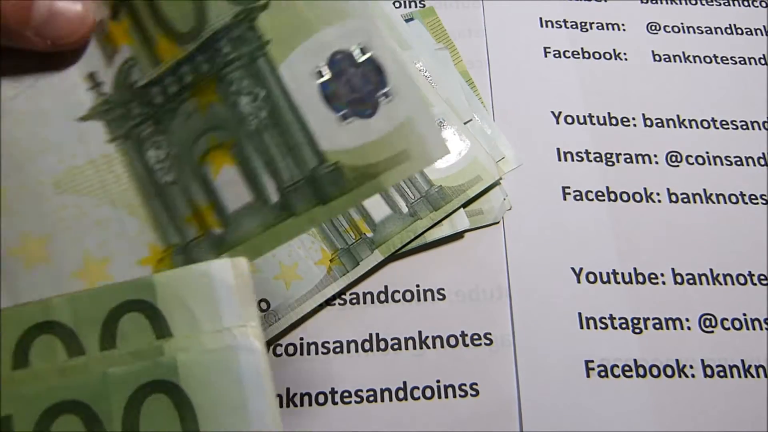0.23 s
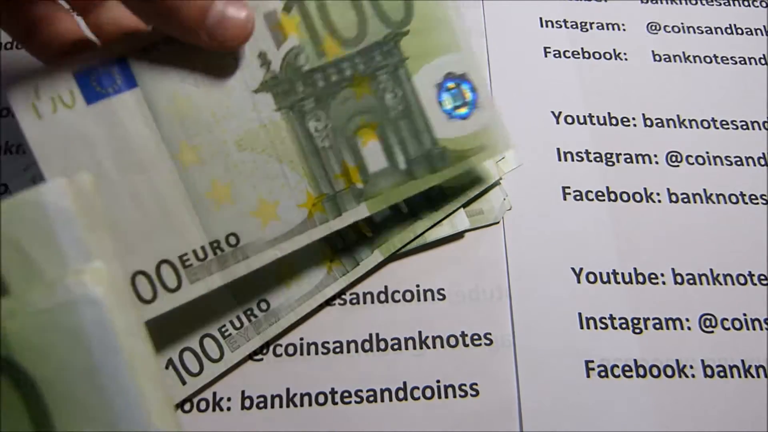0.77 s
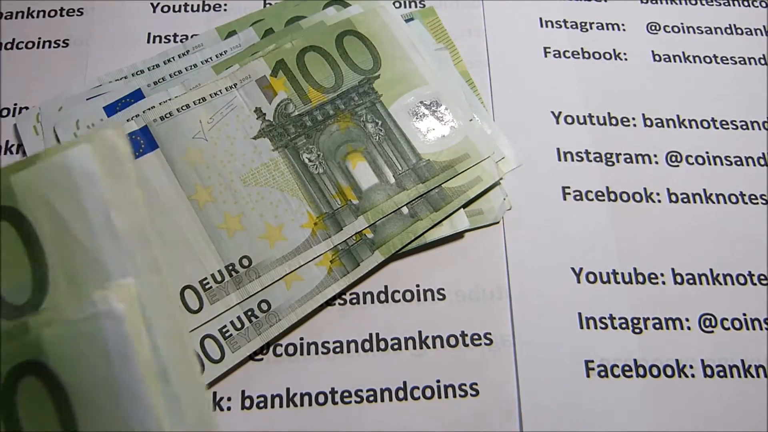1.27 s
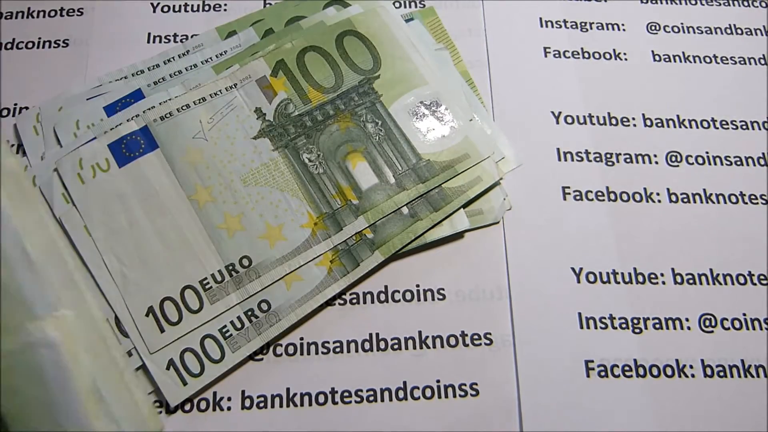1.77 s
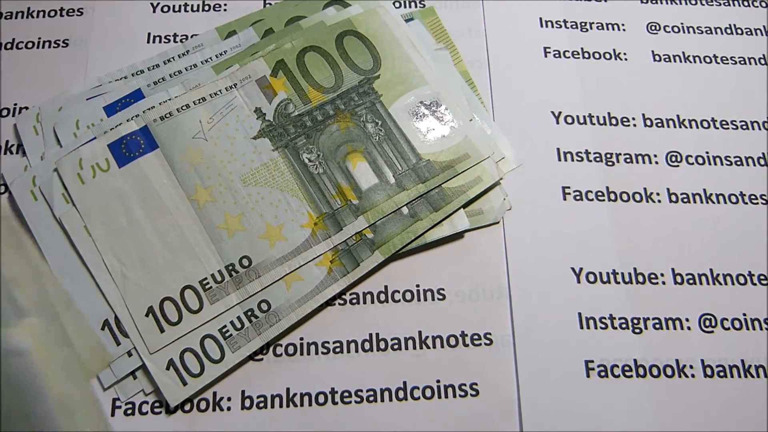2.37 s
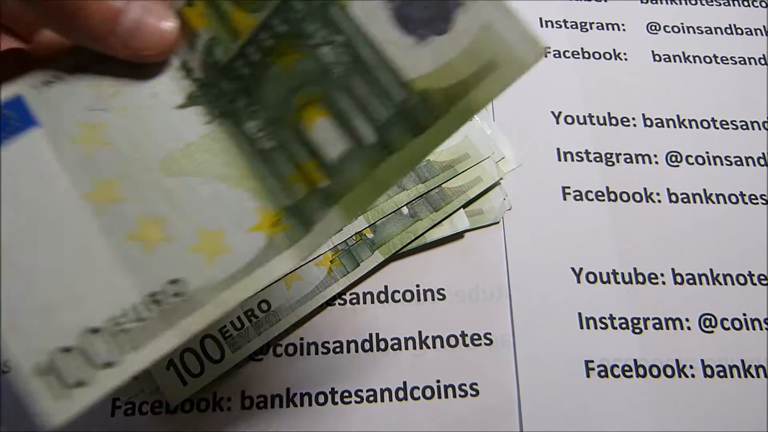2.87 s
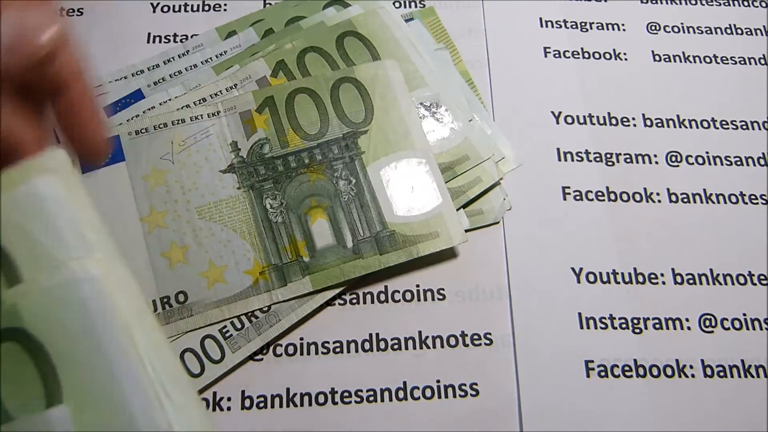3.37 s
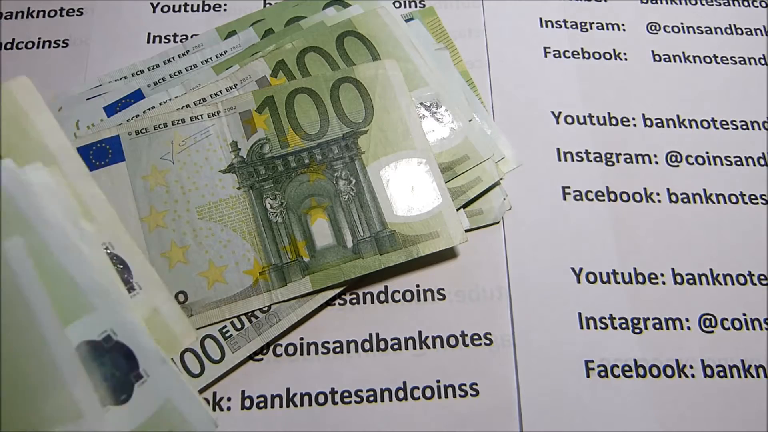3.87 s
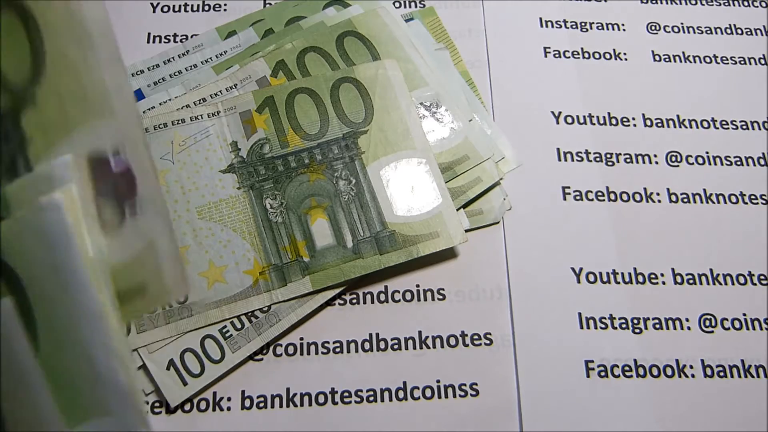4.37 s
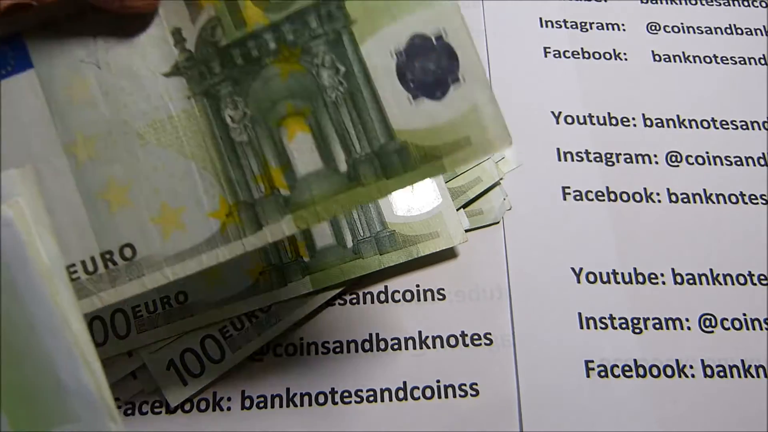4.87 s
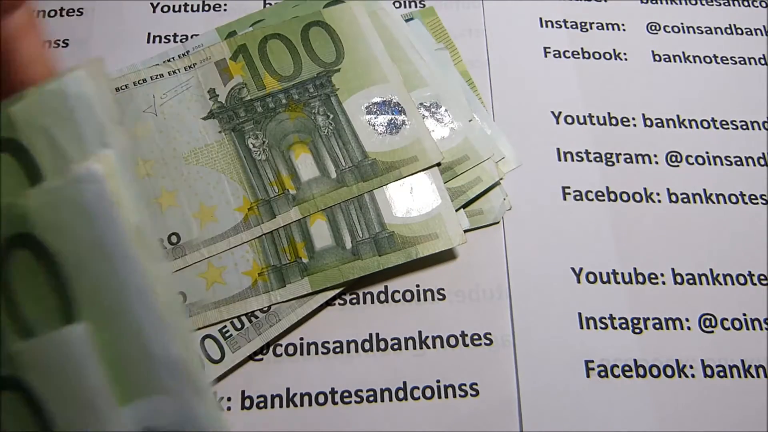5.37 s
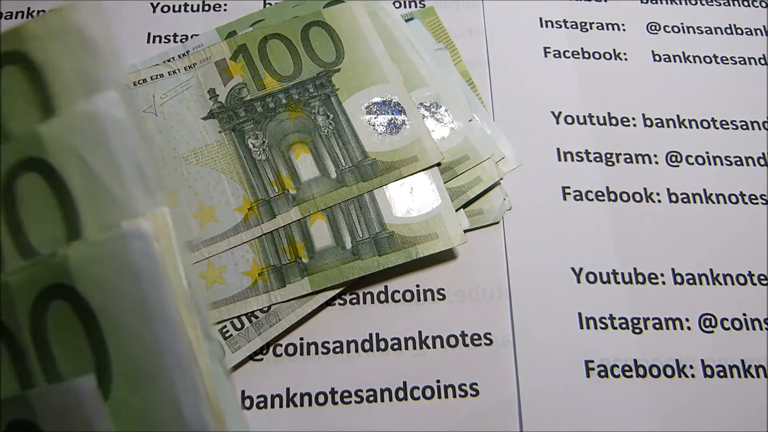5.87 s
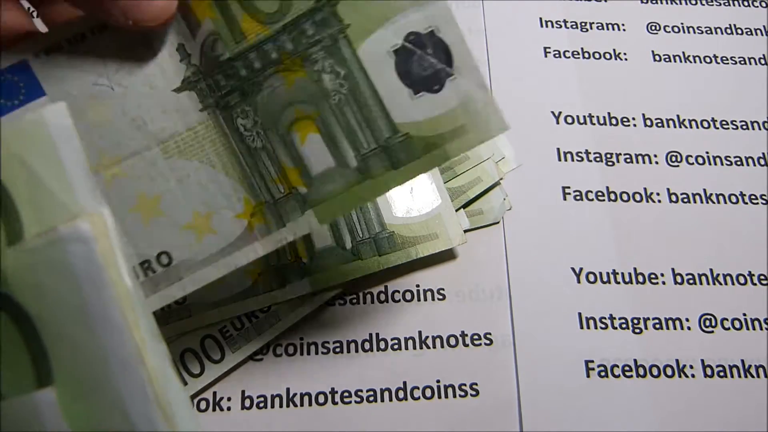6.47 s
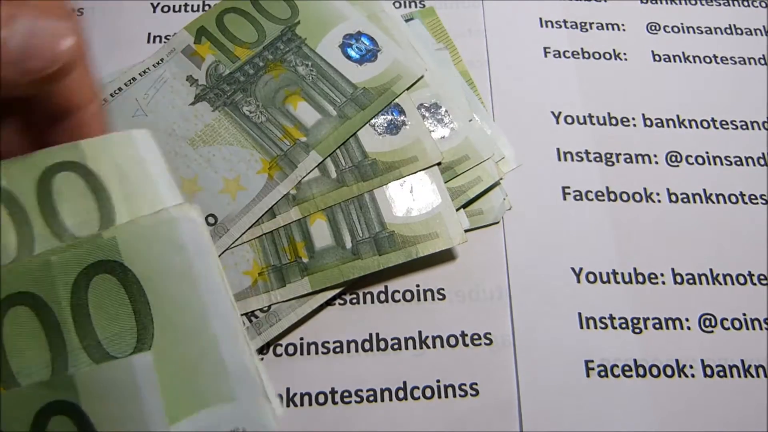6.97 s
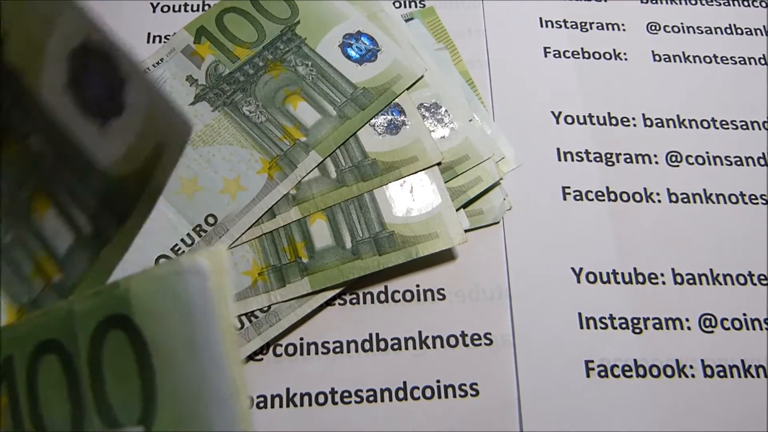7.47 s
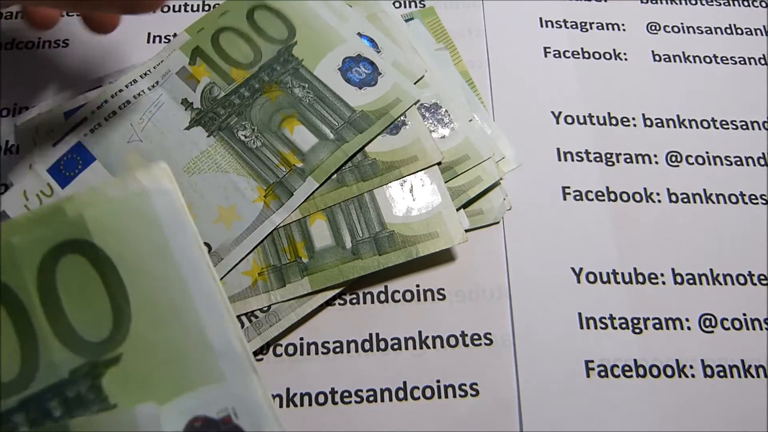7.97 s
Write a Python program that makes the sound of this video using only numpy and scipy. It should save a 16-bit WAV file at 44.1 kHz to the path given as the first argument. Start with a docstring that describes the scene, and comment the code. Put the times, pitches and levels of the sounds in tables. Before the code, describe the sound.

Banknotes slide one by one off a wad onto a pile, hissing and crackling crisply, until one taut note snaps loudly near the end.

```python
"""Grainy hisses of a thumb sliding paper over paper run throughout: banknotes peeled off a wad onto a pile on a table.
Strokes are coloured friction noise; pats, buckles and flicks are dying bursts of noise in their own bands.
A note drags with a sinking hollow rush, a few faint tones ring, and near the end a taut note snaps loudly.
Table echoes, a small quiet room, a faint handling hum and background hiss surround it, in stereo close to a camera."""
import sys
import numpy as np
from scipy import signal
from scipy.fft import rfft, irfft
from scipy.io import wavfile

SR = 44100
rng = np.random.default_rng(int(sys.argv[2]) if len(sys.argv) > 2 else 0)


def pcm_store(signal):
    """Save signal as 16-bit PCM."""
    levels = np.round(np.clip(np.atleast_2d(signal), -1, 1) * 32767)
    wavfile.write(sys.argv[1], SR, levels.astype(np.int16).T)


N = 362061
TIME = np.arange(N) / SR  # [s]
EDGE_HZ = 15700
STROKE_RISE_S, STROKE_RELEASE_S = 0.0331, 0.037  # quarter-sine rise; 1/e release
REST_HISS_DB, REST_BODY_DB = -72.5, -75  # the held wad never lies quite still

# still room and microphone hiss, common to both sides: (frequency [Hz], relative density [dB])
AIR_MID_COLOUR = [(20, 3), (60, -1.5), (130, 1.5), (215, -1), (340, 1.5), (600, -1), (1200, -6.5),
                  (2500, -7), (4000, -11), (7000, -9.5), (10000, -12.5), (15500, -21.5)]
# the same, opposite in the two sides: (frequency [Hz], relative density [dB])
AIR_SIDE_COLOUR = [(20, -21.5), (90, -17.5), (160, -11.5), (250, -9.5), (400, -14), (600, -11),
                   (1000, -14.5), (2000, -20.5), (4000, -25), (8000, -29.5), (15500, -44.5)]
# low resonance of the still room: (frequency [Hz], width [Hz], level above the plain colour [dB])
ROOM_MODE_PEAK = [(211.5, 17.5, 10.5)]
# hollow hum as the camera is jostled: (middle time [s], length [s], relative level [dB])
JOSTLE_SWELLS = [(1.4, 11.1, -64), (2.898, 0.53, -68.5), (3.98, 0.234, -61.5), (7.297, 0.94, -65.5)]
# paper over paper:
# (start [s], length [s], relative hiss level [dB], swell start to end [dB], relative body level [dB])
PAPER_STROKES = [(-0.022, 0.0754, -53.5, -7, -63.5), (0.079, 0.0728, -47.5, 8, -56),
                 (0.164, 0.0602, -44.5, 2, -52.5), (0.263, 0.0808, -48, 7, -59),
                 (0.466, 0.0842, -52, 5.5, -59.5), (0.591, 0.112, -52, -3, -59.5),
                 (0.718, 0.0317, -45.5, 0, -57.5), (0.805, 0.013, -50.5, 0, -62.5),
                 (0.995, 0.035, -62.5, -4.5, -74.5), (1.116, 0.0613, -58, 7.5, -66.5),
                 (1.229, 0.04, -58.5, 5.5, -64.5), (1.465, 0.0178, -58, 8.5, -62.5),
                 (1.571, 0.073, -58, 7, -64.5), (1.673, 0.0905, -60, 6.5, -70.5),
                 (1.799, 0.1634, -54.5, -15.5, -67.5), (1.967, 0.1815, -57.5, 14.5, -66),
                 (2.214, 0.244, -56, 4.5, -65.5), (2.472, 0.1107, -46.5, 5.5, -59.5),
                 (2.646, 0.299, -52.5, -3.5, -62.5), (3.393, 0.258, -67.5, 15.5, -78),
                 (3.673, 0.11, -59.5, 15, -67.5), (3.808, 0.1004, -52.5, 4.5, -63),
                 (3.91, 0.192, -56, 1.5, -65), (4.198, 0.123, -52.0, -6, -62),
                 (4.319, 0.131, -50, 11.5, -57), (4.464, 0.0543, -49.5, 4.5, -61),
                 (4.635, 0.111, -62, -6.5, -74), (4.744, 0.0476, -58, -1, -72),
                 (5.134, 0.085, -63.5, -10.5, -79), (5.249, 0.0324, -53, -1, -65),
                 (5.36, 0.39, -65.5, 2.5, -66.5), (5.54, 0.238, -54.5, 9, -66),
                 (5.794, 0.1403, -51.5, -0.5, -61.5), (5.948, 0.0898, -51.5, 0.5, -59.5),
                 (6.082, 0.0808, -52, 15, -67.5), (6.234, 0.158, -52.5, 0.5, -65.5),
                 (6.447, 0.1402, -60.5, 13, -65.5), (6.656, 0.0924, -65, 9.5, -63),
                 (7.063, 0.18, -51.5, 1, -60.0), (7.276, 0.2214, -55.5, 20.5, -60),
                 (7.538, 0.0824, -44, -5.5, -49), (7.885, 0.098, -58.5, -5.5, -62.5),
                 (8.024, 0.0474, -55.5, 2.5, -64.5), (8.13, 0.0465, -68, 7.5, -67)]
# friction hiss: (frequency [Hz], relative density [dB])
HISS_COLOUR = [(600, -19.5), (1500, -11), (2100, -9.5), (2600, -7), (3200, -6.5), (4200, -4), (5000, 1),
               (6200, 0.5), (7300, 1.5), (8400, -2), (10000, -8.5), (12000, -16), (14000, -25),
               (16000, -67.5)]
# hollow body of the sheet: (frequency [Hz], relative density [dB])
BODY_COLOUR = [(80, -38), (200, -8.5), (430, -10), (600, -2), (900, 2.5), (1050, -1), (1450, 1.5),
               (1750, -3), (2100, -9), (2800, -4.5), (6000, -30)]
# sheets resonating over the table: (frequency [Hz], width [Hz], level above the plain colour [dB])
SHEET_MODES = [(592, 30, -4), (926, 45, 0), (1160, 50, -2), (1312, 30, -1), (1390, 30, -1), (1735, 50, -2)]
# flat sheet pats the pile, a finger or the wad:
# (time [s], decay time [s], relative level [dB], lowest frequency [Hz], highest frequency [Hz])
SHEET_PATS = [(0.031, 0.0068, -56.5, 590, 1380), (0.3017, 0.00223, -47, 560, 1115),
              (0.305, 0.006, -60.5, 150, 330), (0.414, 0.0047, -58, 200, 800),
              (0.972, 0.0184, -62.5, 110, 377), (2.594, 0.0031, -57.5, 500, 1400),
              (2.596, 0.0087, -56, 150, 330), (2.865, 0.0049, -55.5, 130, 804),
              (3.007, 0.0075, -56.5, 450, 1090), (3.659, 0.00132, -60.5, 200, 2000),
              (4.49, 0.00073, -42.5, 220, 1676), (4.588, 0.0028, -51.5, 190, 1490),
              (6.74, 0.0083, -51.5, 300, 1190), (6.884, 0.01, -51, 590, 1484),
              (7.401, 0.0045, -49.5, 554, 1650), (7.489, 0.0034, -49.5, 314, 680),
              (7.531, 0.00207, -30, 840, 1535), (7.536, 0.0051, -35, 898, 1380),
              (7.636, 0.0066, -48, 820, 950), (7.6458, 0.0026, -40, 654, 1980),
              (7.684, 0.0062, -34, 800, 1370), (7.6863, 0.004, -43.5, 325, 2110),
              (7.8, 0.0037, -51, 693, 940), (7.962, 0.00295, -58.5, 654, 890),
              (8.0164, 0.00225, -42.5, 727, 2170)]
# pat colour from its lowest frequency down: (multiple of lowest frequency [1], relative density [dB])
PAT_LOW_SKIRT = [(.15, -35), (.65, -6), (1, 2.5)]
# pat colour from its highest frequency up: (multiple of highest frequency [1], relative density [dB])
PAT_HIGH_SKIRT = [(1, 3), (1.45, -10), (3, -14), (9, -73.5)]
# sheet buckles: (time [s], decay time [s], relative crack level [dB], main facet [Hz], second facet [Hz],
# top of the crack's band [Hz], relative flap level [dB], relative air push level [dB])
SHEET_BUCKLES = [(0.2228, 0.0033, -57.5, 4900, 6000, 8000, -58.5, -68),
                 (0.953, 0.0023, -64, 3200, 2300, 6500, -65, -60.5),
                 (0.971, 0.0019, -61, 2370, 2250, 3000, -60.5, -61.5),
                 (0.993, 0.00105, -55, 6200, 4700, 7100, -77, -66),
                 (1.011, 0.002, -67, 3100, 2200, 4000, -76, -71.5),
                 (1.0196, 0.00202, -47.5, 7200, 6430, 8800, -52.5, -60),
                 (1.839, 0.00255, -46, 4720, 2510, 5500, -51.5, -64),
                 (1.862, 0.0012, -48, 4720, 2980, 5500, -58.5, -70.5),
                 (2.615, 0.0031, -64.5, 6000, 4500, 8000, -55, -57),
                 (2.695, 0.00323, -40, 2355, 6200, 7350, -52, -69.5),
                 (2.717, 0.0052, -39.5, 6260, 5300, 8700, -51, -58.5),
                 (2.739, 0.0025, -46, 4630, 5500, 8000, -59, -65.5),
                 (2.755, 0.0036, -48.5, 4600, 3400, 7500, -66, -66.5),
                 (2.769, 0.0042, -40, 5360, 4300, 8200, -54, -63.5),
                 (2.775, 0.00334, -40.5, 5340, 2520, 8200, -52, -70),
                 (2.832, 0.0029, -40.5, 6300, 2440, 8200, -53.5, -75.5),
                 (2.8412, 0.0015, -38, 4770, 5700, 7000, -54, -55.5),
                 (2.851, 0.0017, -44.5, 5300, 4060, 7000, -55, -57),
                 (2.883, 0.0032, -40, 5640, 2480, 7650, -52, -59),
                 (2.9505, 0.0026, -51, 3990, 6000, 8000, -60.5, -78),
                 (2.9944, 0.0019, -46.5, 4070, 4250, 5800, -60, -64),
                 (3.0282, 0.00154, -39.5, 5095, 3510, 8080, -54, -61.5),
                 (3.161, 0.0038, -64, 2300, 3200, 7000, -58, -68),
                 (4.187, 0.0017, -57.5, 2300, 3480, 7000, -55.5, -62),
                 (5.2408, 0.0033, -46, 6140, 2680, 11100, -54, -61.5),
                 (5.271, 0.00095, -54, 4220, 2900, 5400, -55.5, -60),
                 (5.603, 0.00227, -55.5, 6600, 4500, 8000, -56, -68.5),
                 (7.5314, 0.0012, -32.5, 6850, 5100, 11900, -31, -70),
                 (7.536, 0.00275, -37, 3750, 5400, 8500, -44.5, -69),
                 (7.6871, 0.003, -39, 4820, 3400, 7500, -35.5, -48.5),
                 (8.0154, 0.00205, -47.5, 4780, 3600, 6500, -56, -73.5)]
# creases giving way: (frequency [Hz], relative density [dB])
CRACK_COLOUR = [(400, -39.5), (1200, -4), (2000, -2.5), (2450, 4), (3200, 1), (3900, 3), (5200, 1.5),
                (6600, 3.5), (8300, 3.5), (9500, -3.5), (12000, -6.5), (16000, -46.5)]
# whole sheet flipping: (frequency [Hz], relative density [dB])
FLAP_COLOUR = [(150, -31), (310, -7.5), (450, -4.5), (620, 5.5), (830, 3), (1300, 4), (1700, 3),
               (2200, 3.5), (3000, -5.5), (5000, -5), (12000, -79)]
# air pushed by the sheet: (frequency [Hz], relative density [dB])
PUSH_COLOUR = [(30, -36), (90, -15), (140, -3), (220, 0), (300, -3), (450, -7), (650, -8), (1100, -20),
               (4000, -60)]
# edge slips off the wad: (time [s], decay time [s], relative level [dB])
EDGE_FLICKS = [(0.944, 0.004, -56.5), (1.156, 0.009, -62), (1.366, 0.0084, -52), (1.482, 0.0057, -47),
               (3.21, 0.0086, -49.5), (3.572, 0.0121, -50), (4.069, 0.0147, -46.5), (4.157, 0.026, -46.5),
               (4.626, 0.0099, -52), (6.158, 0.015, -47.5), (6.498, 0.00096, -58.5), (6.939, 0.0165, -54.5),
               (7.79, 0.0145, -48)]
# table, or something on it, rings: (time [s], frequency [Hz], relative starting level [dB], T60 [s])
TABLE_RINGS = [(4.59, 226.6, -64, 0.99), (7.687, 845, -54.5, 0.47), (7.797, 841.7, -51.5, 0.267)]
# taut note ringing after its snap: (frequency [Hz], relative starting level [dB], T60 [s])
TAUT_MODES = [(946, -42.5, 0.17), (1309, -40, 0.2), (1390, -52.5, 0.078), (1702, -35.5, 0.067)]
# reverberation of the room: (frequency [Hz], T60 [s])
ROOM_DECAY = [(150, 0.324), (800, 0.2), (2500, 0.217), (6000, 0.1796), (12000, 0.12)]
# the wad moves about: (time [s], direct sound, left minus right before widening [dB])
WAD_PLACE = [(0.0, 2.5), (0.82, -0.5), (1.0, 3), (2.31, 4), (3.24, 0.5), (3.8, 4.5), (4.96, 1), (5.84, 3),
             (6.5, 0), (7.55, 2.5), (8.0, 0.5)]
# stereo difference of the microphone pair: (frequency [Hz], side gain [dB])
SIDE_GAIN = [(100, -5), (250, 10), (420, 15), (700, 4.5), (1200, 2.5), (4500, -4.5), (8300, 2.5),
             (14000, 0.5)]


def amp(db):
    """Decibels to gain."""
    return 10 ** (np.asarray(db) / 20)


def evened(x):
    """Scales to rms 1."""
    return x / np.sqrt(np.mean(x ** 2) + 1e-20)


def read(points, hz):
    """Interpolates a table on a log-frequency axis."""
    f, value = np.transpose(points)
    return np.interp(np.log(hz + 1), np.log(f + 1), value)


def add(mix, s, sound):
    """Mixes a sound in at time s, or at 0 if s is negative."""
    part = mix[max(round(s * SR), 0):][:len(sound)]
    part += sound[:len(part)]


def colour(x, points, modes=(), size=4096):
    """Minimum-phase filter of energy 1 with a given spectrum and resonances on top."""
    hz = abs(np.fft.fftfreq(size, 1 / SR))
    peaks = sum(amp(db) ** 2 / (1 + (2 * (hz - f) / width) ** 2) for f, width, db in modes)
    log_gain = np.log(amp(read(points, hz)) * np.sqrt(1 + peaks))
    spectrum = np.exp(np.conj(signal.hilbert(log_gain)))
    ring = np.fft.ifft(spectrum).real[:size // 2]
    return signal.oaconvolve(x, ring / np.linalg.norm(ring))[:len(x)]


def wander(hz):
    """Slow random curve of rms 1; its spectrum falls to half amplitude at hz."""
    f = np.fft.rfftfreq(N, 1 / SR)
    spectrum = rfft(rng.standard_normal(N)) / (1 + (f / hz) ** 2)
    return evened(irfft(spectrum, N))


def burst(decay_s, rise_s, lead=0., size=3000):
    """Dying swarm of tiny slips after an optional click (lead), with the energy of 10 ms at rms 1."""
    t = np.arange(size) / SR
    envelope = (1 - np.exp(-t / rise_s)) * np.exp(-t / max(decay_s, 1 / SR))
    slips = rng.standard_normal(size) * envelope
    slips /= np.linalg.norm(slips)
    slips[0] = lead
    return slips / np.linalg.norm(slips) * np.sqrt(SR / 100)


def drone(hz, half_width_hz, size):
    """Noise of rms 1 in one narrow resonance, at half amplitude half_width_hz from its centre."""
    f = np.fft.rfftfreq(size, 1 / SR)
    spectrum = rfft(rng.standard_normal(size)) / (1 + ((f - hz) / half_width_hz) ** 2)
    return evened(irfft(spectrum, size))


def air(mid_db=-67, side_db=-66):
    """Quiet room rumble and microphone hiss: one noise common to both sides, one opposite in them."""
    mid = amp(mid_db) * colour(rng.standard_normal(N), AIR_MID_COLOUR, ROOM_MODE_PEAK)
    side = amp(side_db) * colour(rng.standard_normal(N), AIR_SIDE_COLOUR)
    return np.array([mid + side, mid - side])


def jostle(hz=360, half_width_hz=24):
    """Narrow hollow hum, opposite in the two microphones, swelling and fading with the handling."""
    swells = np.zeros(N)
    for s, length_s, db in JOSTLE_SWELLS:
        phase = np.pi * np.clip((TIME - s) / length_s, -.5, .5)
        swells += amp(db) * np.cos(phase)
    return swells * drone(hz, half_width_hz, N) * np.array([[1], [-1]])


def strokes():
    """Strength of hiss and of body: each stroke gathers speed, swells or eases, and coasts to a stop."""
    power = amp([[REST_HISS_DB], [REST_BODY_DB]]) ** 2 * np.ones(N)
    for start_s, length_s, hiss_db, swell_db, body_db in PAPER_STROKES:
        t = TIME[:round((length_s + 10 * STROKE_RELEASE_S) * SR)]
        rise = np.sin(np.pi / 2 * np.minimum(t / STROKE_RISE_S, 1))
        hold = amp(swell_db * (np.minimum(t / length_s, 1) - .5))
        release = np.exp(-np.maximum(t - length_s, 0) / STROKE_RELEASE_S)
        for layer, db in zip(power, (hiss_db, body_db)):
            add(layer, start_s, (amp(db) * rise * hold * release) ** 2)
    return np.sqrt(power)


def table_echo(x, delay_s, sway, gain):
    """The sheet moves over the table, so its first echo combs the sound at drifting pitches."""
    drifting_delay_s = delay_s * np.exp(sway * wander(hz=3.18))
    echo = np.interp(TIME - drifting_delay_s, TIME, x)
    return (x + gain * echo) / np.hypot(1, gain)


def sliding(catches_per_s=2600, catch_db=-4, judder_db=1.3, slip_db=0.82, hiss_db=-0.9647, body_db=-2):
    """Fibres rub and a few catch; quick stick-slip and the hand's uneven pull make the paper judder."""
    catches = rng.uniform(-1, 1, N) * amp(4 * np.minimum(rng.exponential(1, N), 2))
    catches *= rng.random(N) < catches_per_s / SR
    friction = evened(rng.standard_normal(N) + amp(catch_db) * evened(catches))
    judder = amp(judder_db * wander(hz=22.4) + slip_db * wander(hz=260))
    pull, flex = strokes() * judder
    hiss = colour(table_echo(friction * pull, delay_s=0.000495, sway=0.4613, gain=0.25), HISS_COLOUR)
    flexing = rng.standard_normal(N) * flex
    echoed_flexing = table_echo(flexing, delay_s=0.001981, sway=0.42, gain=0.36)
    body = colour(echoed_flexing, BODY_COLOUR, SHEET_MODES)
    return amp(hiss_db) * hiss + amp(body_db) * body


def pats():
    """Each pat is one short push on the air, a click and a dying burst in its own band."""
    out = np.zeros(N)
    for s, decay_s, db, low_hz, high_hz in SHEET_PATS:
        band = [(k * low_hz, level) for k, level in PAT_LOW_SKIRT]
        band += [(k * high_hz, level) for k, level in PAT_HIGH_SKIRT]
        add(out, s, amp(db) * colour(burst(decay_s, rise_s=.001, lead=1.5), band))
    return out


def creases(relative_width=0.1, main_db=8, second_db=4.5, small_db=-3.0, rise_s=0.000283, small_count=3):
    """Creases give way in a swarm; two large facets set the pitch, small ones ring at random pitches."""
    out = np.zeros(N)
    for s, decay_s, db, main_hz, second_hz, top_hz, _, _ in SHEET_BUCKLES:
        facets = [(main_hz, main_db), (second_hz, second_db)]
        facets += [(hz, small_db) for hz in 2000 * 4 ** rng.random(small_count)]
        modes = [(hz, relative_width * hz, level) for hz, level in facets]
        # a lower top_hz gives the duller crack of a slack sheet
        band = [(hz, level - 10 * np.log10(1 + (hz / top_hz) ** 8)) for hz, level in CRACK_COLOUR]
        add(out, s, amp(db) * colour(burst(decay_s, rise_s), band, modes))
    return out


def flaps(push_db=-2):
    """As it buckles, the whole sheet flips over at one stroke and pushes air."""
    flap, push = np.zeros((2, N))
    for s, decay_s, *_, sheet_db, air_db in SHEET_BUCKLES:
        add(flap, s, amp(sheet_db) * burst(decay_s, rise_s=.001, lead=1.1))
        add(push, s, amp(air_db) * burst(decay_s, rise_s=.001, lead=1.3))
    return colour(flap, FLAP_COLOUR, SHEET_MODES) + amp(push_db) * colour(push, PUSH_COLOUR)


def flicks(rise_s=0.00272, hiss_db=-1, body_db=-14):
    """An edge scrapes free: a short spurt of noise in the colours of the sliding paper."""
    force = np.zeros(N)
    for s, decay_s, db in EDGE_FLICKS:
        add(force, s, amp(db) * burst(decay_s, rise_s))
    hiss = colour(force, HISS_COLOUR)
    body = colour(force, BODY_COLOUR, SHEET_MODES)
    return amp(hiss_db) * hiss + amp(body_db) * body


def drag(s=3.75, length_s=0.42, from_hz=640, to_hz=320, half_width_hz=70, db=-70):
    """A note drags over the wad: a soft hollow rush that sinks as the gap under it grows."""
    out, size = np.zeros(N), round(length_s * SR)
    shift_hz = np.geomspace(from_hz, to_hz, size) - from_hz
    glide = np.exp(2j * np.pi * np.cumsum(shift_hz) / SR)
    rush = (signal.hilbert(drone(from_hz, half_width_hz, size)) * glide).real
    add(out, s, amp(db) * rush * np.hanning(size))
    return out


def table_rings(waver=0.0058, flutter_db=1.5):
    """A few faint tones ring and die away, wavering slightly in pitch and level."""
    out, t = np.zeros(N), TIME[:SR]
    bend = waver * wander(hz=22)[:SR]  # relative pitch
    flutter = amp(flutter_db * wander(hz=45)[:SR])
    for s, hz, db, t60_s in TABLE_RINGS:
        tone = np.sin(2 * np.pi * hz * np.cumsum(1 + bend) / SR)
        add(out, s, amp(db - 60 * t / t60_s) * flutter * tone)
    return out


def snap(s=7.5309, hz=6400, crack_db=-5.6):
    """The taut note lets go like a whip: one sharp crack a few cycles long, then the sheet rings."""
    t = TIME - TIME[round(s * SR)]
    crack = amp(crack_db) * np.exp(-(t / .00021) ** 2) * np.cos(2 * np.pi * hz * t)
    ring = sum(amp(db - 60 * abs(t) / t60_s) * np.sin(2 * np.pi * f * t) for f, db, t60_s in TAUT_MODES)
    return crack + ring * (t >= 0)


def reflections(x, t60, delay_s, size=22050):
    """Dense echoes of energy 1, different for each microphone, each band dying at its own speed."""
    hz, t, z = signal.stft(rng.standard_normal((2, size)), SR, nperseg=128)
    decay = amp(-60 * t / read(t60, hz)[:, None])
    tail = signal.istft(z * decay, SR)[1]
    tail /= np.linalg.norm(tail, axis=1, keepdims=True)
    tail = np.pad(tail, ((0, 0), (round(delay_s * SR), 0)))
    return signal.oaconvolve(x[None], tail, axes=1)[:, :N]


def room(x, count=3):
    """Three sets of room echoes fade in and out by turns at a steady rate."""
    turn = np.pi * (8 * TIME + np.arange(count)[:, None] / count)
    shares = np.cos(turn) * np.sqrt(2 / count)
    return sum(reflections(x * share, ROOM_DECAY, delay_s=.004) for share in shares)


def widen(pair):
    """The microphone pair stresses left-right differences in some bands and softens them in others."""
    mid, side = pair.mean(0), (pair[0] - pair[1]) / 2
    gain = amp(read(SIDE_GAIN, np.fft.rfftfreq(N, 1 / SR)))
    side = irfft(rfft(side) * gain, N)
    return np.array([mid + side, mid - side])


def scene(table_db=-12, room_db=-8, crease_room_db=-3, pat_room_db=-8.0):
    """Table and hands answer at once, then the room; creases radiate mostly away from the camera, pats towards it."""
    crackle, patting = creases(), pats()
    paper = sliding() + flicks() + flaps() + snap() + drag()
    handling = paper + crackle + patting
    near = reflections(handling, [(500, 0.0372), (6000, 0.0091)], delay_s=.0007)  # (Hz, T60 s)
    far = room(amp(room_db) * paper + amp(crease_room_db) * crackle + amp(pat_room_db) * patting)
    lean_db = np.interp(TIME, *np.transpose(WAD_PLACE)) / 2
    direct = (handling + table_rings()) * amp([lean_db, -lean_db])
    return widen(direct + amp(table_db) * near + far) + jostle() + air()


def record(dry):
    """The camera's band limit: a steep linear-phase low-pass."""
    lowpass = signal.firwin(511, EDGE_HZ, window=("kaiser", 9), fs=SR)
    return signal.oaconvolve(dry, lowpass[None], "same")


dry = scene()
out = record(dry)
pcm_store(out)
```